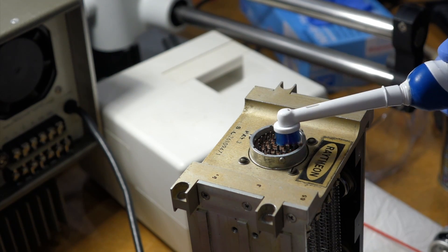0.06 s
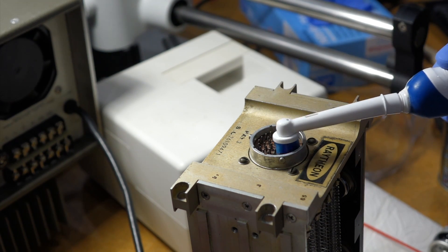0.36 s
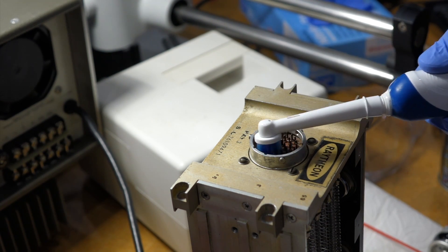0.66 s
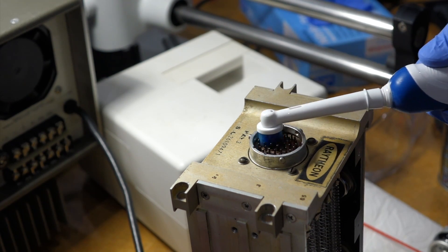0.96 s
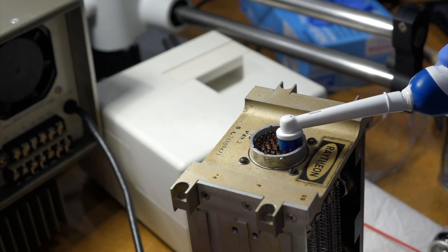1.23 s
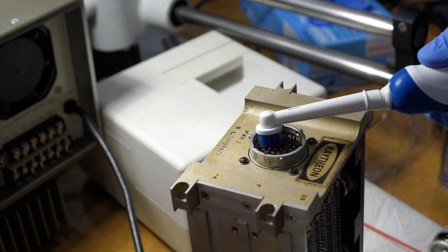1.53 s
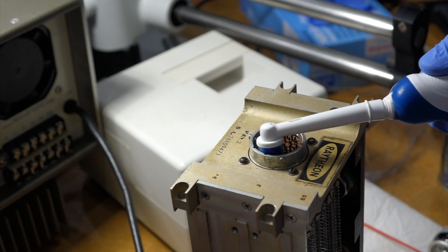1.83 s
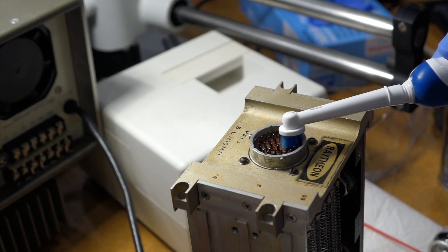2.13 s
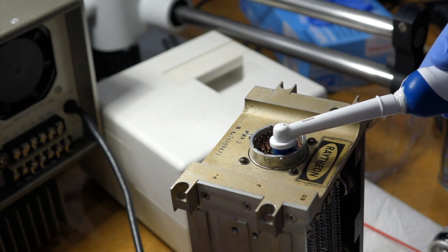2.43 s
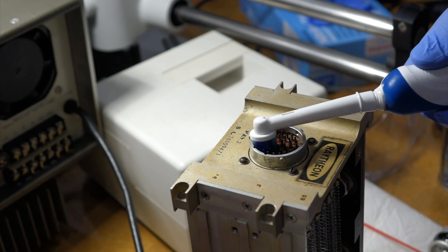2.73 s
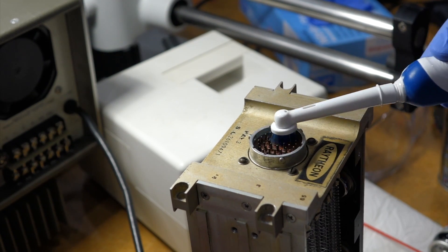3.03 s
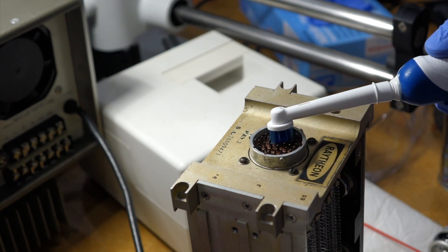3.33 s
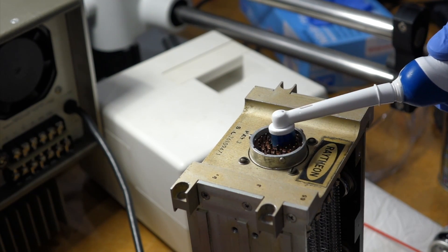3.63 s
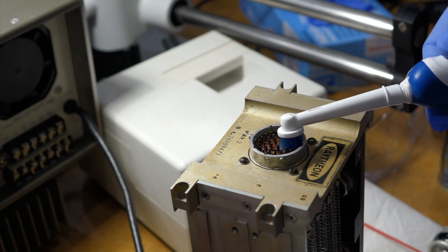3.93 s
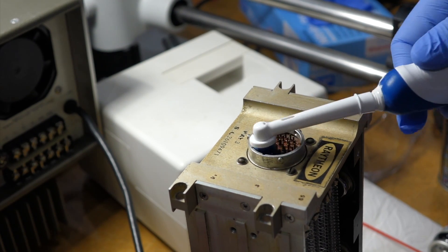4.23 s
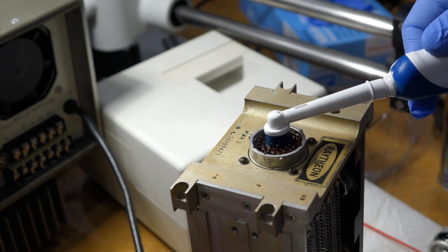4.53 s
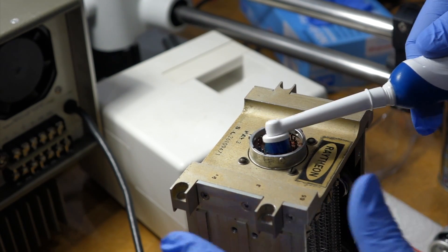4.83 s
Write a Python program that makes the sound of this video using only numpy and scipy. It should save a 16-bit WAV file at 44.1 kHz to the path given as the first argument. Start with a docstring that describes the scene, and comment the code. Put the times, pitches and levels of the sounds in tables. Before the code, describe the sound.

An electric toothbrush scrubs the pins of a metal connector, its head rattling in a fast buzz while the bristles hiss and rasp and the metal rings lightly. It snags a few times, slows under pressure and runs down a little past halfway. A few handling clicks follow, then it spins up and scrubs on. The sound is close and fairly dry, on a workbench in a quiet room.

```python
"""Electric toothbrush on corroded pins

An electric toothbrush scrubs a metal connector on a workbench. Its head knocks at both ends of every
swing, ringing pins and shell, while the bristles hiss, rasp and snag over the motor's hum. The motor runs
down, the handle is shifted, a click sounds and it spins up again. Faint room and electrical noise lie below."""
import sys
import numpy as np
from scipy import signal
from scipy.fft import rfft, irfft
from scipy.io import wavfile

SR = 44100
rng = np.random.default_rng(int(sys.argv[2]) if len(sys.argv) > 2 else 0)


def transcribe(u):
    """Save the signal u as a 16-bit wav file named by the first command-line argument.

    u: samples, shape (n,) or (channels, n), limited to [-1, 1]; the rate is SR.
    q: integer samples, one column per channel.
    """
    v = np.clip(np.atleast_2d(u).T, -1, 1)
    q = np.round(v * 32767).astype(np.int16)
    wavfile.write(sys.argv[1], SR, q)


N = 219559
TIME = np.arange(N) / SR

# two motor runs, the brush seated differently in each: on/s, off/s, base bristle pressure/0-1
MOTOR_RUNS = [(-.055, 2.805, 0.29), (3.573, 5.2, 0.69)]
# leaning on the brush slows the drive: t/s, rate lost/(reversals per s)
LOAD_SAG = [(.75, 0), (1.15, 2.2), (1.58, 4.7), (1.8, 2.5), (1.98, 3), (2.16, 10), (2.27, 35), (2.38, 42),
            (2.5, 23), (2.64, 15), (2.8, 11.5), (3.6, 0), (3.95, .3), (4.35, 2.5), (4.55, 4.7), (4.78, 4.7),
            (4.98, 10)]
# scrubbing balance as the brush circles: t/s, bristle hiss/dB, head rattle/dB, pin ring/dB
SCRUB_LEVELS = [(.05, -36.5, -38.5, -46), (.16, -34.5, -44.5, -51), (.3, -38, -40, -46.5),
                (.55, -35, -42, -40), (.95, -30.5, -37, -42), (1.375, -33, -40, -43.5),
                (1.41, -31.5, -36, -43), (1.6, -32, -40.5, -40.5), (1.85, -33.5, -37, -44),
                (2.1, -32, -37.5, -44.5), (2.3, -36, -38, -46.5), (2.45, -36.5, -38.5, -39),
                (2.53, -37, -43, -48.5), (2.62, -37.5, -38.5, -37), (2.74, -33, -37, -40.5),
                (2.82, -31, -39.5, -43.5), (3.72, -34, -37, -45), (3.85, -35, -49, -43),
                (4.3, -33.5, -43, -44), (4.55, -30, -43.5, -41.5), (4.75, -34, -47, -43),
                (4.98, -34.5, -45, -59)]

# resonances of brush head, connector shell, handle, neck and pin block: f/Hz, width/Hz, level/dB
HEAD_MODES = [(454, 120, -19), (866, 66, -12), (1190, 250, -13), (1377, 160, -3), (1787, 220, -8)]
SHELL_MODES = [(420, 240, -12), (960, 47, -3), (1150, 79, -8), (2500, 230, -0.5), (3050, 140, -5),
               (3400, 170, -0.5)]
HANDLE = [(480, 90, -9), (1210, 150, 2), (1750, 500, -2), (2480, 480, -1), (3350, 300, 0), (4500, 900, -5),
          (6100, 1200, -8), (9200, 1800, -12)]
NECK = [(480, 110, 0), (1320, 170, 3), (2430, 99, -4), (3890, 130, -8), (4500, 110, -11)]
PIN_BLOCK = [(1150, 120, 7), (2320, 110, 3), (2560, 130, 1), (2900, 150, 0), (3420, 130, -3),
             (3890, 100, -8)]
# two moving air resonances between head and socket: t/s, hollow f/Hz, rim gap f/Hz, rim level/dB
AIR_GAPS = [(.3, 1640, 2030, 2), (1.25, 1630, 2100, 0), (1.95, 1530, 2118, 1), (2.1, 1710, 1940, -2),
            (2.28, 1500, 2130, -9), (2.85, 1514, 2120, 7), (3.75, 1490, 2230, 9), (4.05, 1490, 2170, -1),
            (4.35, 1530, 2130, 3), (4.82, 1590, 2060, 2.5), (4.98, 1590, 2040, -2)]
# two-note ring of the pins under the brush: t/s, lower f/Hz, upper f/Hz, upper against lower/dB
PIN_NOTES = [(.3, 2570, 2790, -4), (1.0, 2580, 2820, -4.5), (2.25, 2580, 2820, -3), (2.39, 2570, 2830, -2),
             (2.44, 2490, 2860, -3), (2.7, 2548, 2920, -5), (3.95, 2560, 2860, -3), (4.35, 2520, 2960, 3.5),
             (4.65, 2560, 2920, 2), (4.8, 2600, 3040, 8)]
# the head leans on the shell and rings it: t/s, length/s, level/dB
SHELL_LEANS = [(0.2, 0.25, -47.5), (3.816, .55, -41), (4.424, .6, -40)]

# colour of lightly and firmly pressed bristles: f/Hz, density/dB
LIGHT_HISS = [(100, -14), (700, -12.5), (2000, -20), (3150, -10.5), (4100, -2.5), (4450, -4), (4800, -0.5),
              (5400, -0.5), (5950, 1), (6300, -12.5), (7300, -14.5), (8700, -14.5), (9500, -10),
              (10100, -13), (10900, -7)]
FIRM_HISS = [(100, -12), (700, -20.5), (2000, -1), (2850, 2.5), (3150, -7), (3800, -4), (4600, -4.5),
             (5400, 4), (5950, 5.5), (6600, 1), (7400, -8.5), (8600, -11.5), (9400, -11.5), (10100, -10),
             (10900, -11.5)]
# the tufts flick cleanly or drag: t/s, drag against flicks/ratio
TUFT_DRAG = [(.12, 1.15), (.4, .85), (1.15, .45), (1.5, .8), (1.75, 1.1), (1.95, .55), (2.4, .85),
             (2.8, .7), (3.75, .85), (4.3, .6), (4.55, .33), (4.98, .7)]
# bristles dragged across the pins: t/s, length/s, level/dB
RASP_PASSES = [(0.224, 0.2, -35), (1.382, 0.18, -37), (1.51, 0.082, -34), (3.818, 0.18, -39.5),
               (4.916, .06, -42)]
# the head snags on the shell: t/s, hold/s, decay/s, shell scrape/dB, pin rasp/dB, bristle hiss/dB
SNAGS = [(0.791, .003, 0.0055, -43, -46, -29.5), (1.378, 0.014, 0.01, -39, -32.5, -30.5),
         (1.619, 0.01, 0.049, -23.5, -36, -36), (2.07, 0.019, 0.0072, -48, -45, -35.5),
         (4.367, 0.0029, 0.0024, -45, -40, -25.5)]
# tufts judder along the rim: t/s, length/s, attack/s, release/s, level/dB, first f/Hz, last f/Hz
RIM_JUDDER = (1.48, .2, .1, .035, -34, 1480, 1090)
# tufts spring off a pin: t/s, level/dB
TUFT_SNAPS = [(.944, -22), (1.755, -21), (2.07, -20), (2.076, -19), (2.09, -18), (2.146, -24), (2.601, -24),
              (3.934, -22), (3.972, -22), (4.343, -22), (4.369, -23)]
# colour of pin rasp, shell scrape and tuft snap: f/Hz, density/dB
RASP_COLOUR = [(150, -30), (600, -7.5), (800, -5.5), (1080, 2.5), (1600, 1), (2200, -0.5), (2850, 1),
               (3200, -7.5), (3900, -2.5), (5700, -7), (6800, -8), (11000, -16)]
SCRAPE_COLOUR = [(150, -20), (600, -8), (900, 7.5), (2000, -6), (2900, 14), (3250, 15.5), (4300, 14.5),
                 (5700, 6), (6800, -20), (11000, -28)]
SNAP_COLOUR = [(300, -21), (1500, -19), (2700, 4), (3300, -11), (5700, 12), (7500, 0), (11000, -9)]

# rotor hum at full speed: t/s, level/dB
ROTOR_HUM = [(.1, -67), (.4, -56.5), (.78, -57), (.9, -66), (1.08, -62), (1.18, -54.5), (1.38, -50.5),
             (1.55, -55), (1.8, -64.5), (2.1, -50.5), (2.18, -44.5), (2.25, -69), (2.75, -55), (3.72, -75),
             (3.9, -54.5), (4.5, -58), (4.98, -61)]
# gear whine at full speed: multiple of the full swing rate, level/dB
GEAR_TONES = [(3, -69), (4, -72), (5, -62), (6, -67.5), (8, -69), (10, -65), (11, -59), (13, -58),
              (14, -59), (15, -61), (16, -61)]

# handling clicks: t/s, level/dB, contact/s, decay/s, part that rings
CLICKS = [(3.150, -23.5, .002, .003, NECK), (3.214, -23.5, .004, .0035, PIN_BLOCK),
          (3.549, -15.5, .0005, .0016, HANDLE), (3.638, -19, .0004, .0007, HANDLE)]
# dull bumps of the handle: t/s, level/dB, f/Hz
HANDLE_BUMPS = [(.985, -53, 218), (1.061, -53, 205), (2.893, -46, 187), (2.93, -62, 214), (4.282, -46, 215),
                (4.345, -54, 205), (4.75, -45, 210), (4.835, -43, 327), (4.89, -47.5, 239)]
# tufts slip as the brush is shifted between runs: t/s, length/s, level/dB
TUFT_SLIPS = [(3, 0.033, -44), (3.073, 0.041, -48.5), (3.116, 0.034, -49.5), (3.178, 0.069, -55.5),
              (3.257, 0.026, -53), (3.305, 0.017, -53), (3.378, .015, -57), (3.438, 0.013, -57)]
# faint glove squeaks: t/s, length/s, f/Hz, level/dB
GLOVE_SQUEAKS = [(3.1, 0.032, 1040, -55), (3.405, 0.036, 1075, -54)]

# colour of the room tone: f/Hz, density/dB
ROOM_COLOUR = [(15, 4), (60, 2.5), (130, -5.5), (260, -3), (480, -4), (850, -6), (1200, -5.5), (1700, -10),
               (3000, -15), (5500, -17), (7500, -23), (11000, -28)]
# steady electrical tones: f/Hz, level/dB
ELECTRICAL_TONES = [(60, -67), (1911, -69.5)]

FREE_RATE = 156  # head reversals per s without load


def spin(spin_up_s=.075, coast_s=.27, coast_bend=1.5):
    """Share of full speed: the motor closes in on it when switched on and coasts to rest when off."""
    share = np.zeros(N)
    for on, off, _ in MOTOR_RUNS:
        rise = 1 - np.exp(-np.maximum(TIME - on, 0) / spin_up_s)
        coast = 1 - np.clip((TIME - off) / coast_s, 0, 1) ** coast_bend
        share += rise * coast
    return share


def seating(delay_s=.022, grip_s=.075):
    """Grip (0-1) and base pressure of each run: the bristles take hold just after switch-on."""
    runs = np.array(MOTOR_RUNS)
    current = np.maximum(np.searchsorted(runs[:, 0], TIME) - 1, 0)
    on, _, pressure = runs[current].T
    return np.clip((TIME - on - delay_s) / grip_s, 0, 1), pressure


def knocks(reversals, jitter_s=.00005, uneven_db=.84, return_lag_s=.00025, return_db=-2,
           rebound_s=.0021, rebound_db=-2.5):
    """The head hits the end of its play at each reversal and rebounds; the way back is late and soft."""
    at = np.flatnonzero(np.diff(np.floor(reversals)) > 0)
    chance = np.clip(rng.standard_normal((len(at), 4)), -2, 2)
    returning = np.arange(len(at)) % 2
    hit_at = at / SR + jitter_s * chance[:, 0] + return_lag_s * returning
    force = from_db(uneven_db * chance[:, 1] + return_db * returning)
    rebound_at = hit_at + rebound_s * (1 + .1 * chance[:, 2])
    rebound_force = force * from_db(rebound_db + uneven_db * chance[:, 3])
    hits = np.zeros(N)
    for t, size in ((hit_at, force), (rebound_at, rebound_force)):
        hits[np.clip((t * SR).astype(int), 0, N - 1)] += size
    return hits


def contact(hits, crunch=.55, crunch_s=.0013, rub=.22):
    """Force at the head: each knock trails a short crunch, with sliding friction in between."""
    friction = (crunch * rms_one(fade(hits, crunch_s)) + rub) * rng.standard_normal(N)
    return butter(rms_one(hits) + friction, 4, 367, "high")  # small parts radiate hardly any bass


def head_rattle(hits, roam_hz=35.3):
    """Knocks ring the head and the hollow under it, whose pitch roams as the brush circles."""
    hollow_hz, _, _ = in_time(AIR_GAPS)
    body = resonate(contact(hits), HEAD_MODES)
    hollow = moving_band(contact(hits), hollow_hz + roam_hz * wander(.022), width_hz=185)
    return rms_one(body + hollow)


def pin_ring(hits, width_hz=85, top_hz=3030):
    """The knocked pins ring at two pitches that shift with the brush."""
    lower_hz, upper_hz, upper_db = in_time(PIN_NOTES)
    force = contact(hits)
    lower = moving_band(force, lower_hz, width_hz)
    upper = from_db(upper_db) * moving_band(force, upper_hz, width_hz)
    return rms_one(butter(lower - upper, 12, top_hz))


def shell_ring(hits, head_db, free_db=-15.5):
    """Shell and rim gap ring faintly under the rattle and open up where the head leans on them."""
    _, rim_hz, rim_db = in_time(AIR_GAPS)
    rim = from_db(rim_db) * moving_band(contact(hits), rim_hz, width_hz=130)
    metal = resonate(contact(hits), SHELL_MODES)
    leaning = sum(swells(SHELL_LEANS, attack_s=.055, release_s=.063))
    return np.hypot(leaning, from_db(head_db + free_db)) * rms_one(metal + rim)


def bristles(hits, pressure, snap=.45, flick_s=.001, catches_per_s=420, catch_s=.0008, smooth=.55):
    """The tufts flick over at each reversal and drag in small catches between; pressure colours them."""
    flicks = rms_one(fade(hits, flick_s)) * grains(per_s=30000, spread_db=.5) + snap * rms_one(hits)
    catches = rms_one(fade(rng.random(N) < catches_per_s / SR, catch_s))
    dragging = rms_one((catches + smooth) * grains(per_s=30000, spread_db=.5))
    hiss = tuft_colour(rms_one(flicks + in_time(TUFT_DRAG)[0] * dragging), pressure)
    sheen_hz = 9800 + 450 * wander(.06)  # the tufts' highest ring shifts as they bend
    return hiss + .7 * moving_band(hiss, sheen_hz, width_hz=600)


def tuft_colour(drive, pressure):
    """Pressure crossfades the bristles from their light colour to their firm one."""
    firm = np.clip(pressure, 0, 1)
    return (1 - firm) * coloured(drive, LIGHT_HISS) + firm * coloured(drive, FIRM_HISS)


def pin_rasp(hits, light_db=-41.5):
    """Bristles rasp over the pins in time with the swing: a light bed with a few harder passes."""
    stroke = rms_one(1 + rms_one(fade(hits, .003)))
    passes = swells(RASP_PASSES, attack_s=.0069, release_s=.16)
    level = np.sqrt(from_db(light_db) ** 2 + sum(p ** 2 for p in passes))
    return level * coloured(stroke * grains(per_s=6000, spread_db=3), RASP_COLOUR)


def snags(attack_s=.002):
    """A snag bites at once, holds and dies away: an unbroken scratch on shell, pins and tufts."""
    out = np.zeros(N)
    for k, colour in enumerate((SCRAPE_COLOUR, RASP_COLOUR, FIRM_HISS)):
        level = sum(from_db(dbs[k]) * swell(t, hold, attack_s, decay) for t, hold, decay, *dbs in SNAGS)
        out += level * coloured(grains(per_s=20000, spread_db=1), colour)
    return out


def judder(hits, width_hz=600):
    """The tufts stick and slip along the rim, ringing a resonance that falls as they bend."""
    start, length, attack_s, release_s, db, first_hz, last_hz = RIM_JUDDER
    centre_hz = np.interp(TIME, [start, start + length], [first_hz, last_hz])
    slips = (1 + rms_one(fade(hits, .003))) * grains(per_s=2500, spread_db=1.5)
    ringing = moving_band(moving_band(slips, centre_hz, width_hz), centre_hz, width_hz)
    return from_db(db) * swell(start, length, attack_s, release_s) * rms_one(ringing)


def snaps(decay_s=.00033):
    """Single tufts catch on a pin and spring free with a sharp tick."""
    ticks = np.zeros(N)
    for t, db in TUFT_SNAPS:
        ticks[int(t * SR)] = from_db(db)
    return coloured(fade(ticks, decay_s) * rng.choice([-1, 1], N), SNAP_COLOUR)


def motor(reversals, rate, rotor_ratio=1.135, flutter_db=2.6):
    """The rotor's imbalance hums and the gears add wavering overtones; both fade as the drive slows."""
    def tone(multiple, waver_rad=.17):
        return np.sqrt(2) * np.sin(multiple * (2 * np.pi * reversals + waver_rad * wander(.047)))
    hum_db = in_time(ROTOR_HUM)[0] + flutter_db * wander(.016)  # flutters under load
    hum = from_db(hum_db) * tone(rotor_ratio, waver_rad=.66)
    # under one hard push the rotor buzzes on its third multiple
    push = swell(start=2.08, length=.07, attack_s=.02, release_s=.025)
    buzz = from_db(-53.5) * push * tone(3 * rotor_ratio)
    gears = sum(from_db(db) * tone(k / 2) for k, db in GEAR_TONES)  # two reversals a swing
    return (rate / FREE_RATE) ** 4 * (hum - gears) + buzz


def clicks(attack_s=.0003, top_hz=6000):
    """A spike and a short crack of noise ring the part that is knocked."""
    out = np.zeros(N)
    for t, db, contact_s, decay_s, part in CLICKS:
        crack = .5 * swell(t, contact_s, attack_s, decay_s) * rng.standard_normal(N) + 1e-18
        crack[int(t * SR)] += 3.5
        out += from_db(db) * resonate(butter(crack, 1, top_hz), part)
    return out


def bumps(width_hz=57):
    """The bumped handle thuds on one low resonance."""
    out = np.zeros(N)
    for t, db, hz in HANDLE_BUMPS:
        thud = rms_one(resonate(rng.standard_normal(N), [(hz, width_hz, 0)]))
        out += from_db(db) * swell(t, 0, attack_s=.0041, release_s=.046) * thud
    return out


def tuft_slips(clump_db=3.5, clump_s=.0019):
    """Between runs the tufts slip in small clumps as the brush is shifted."""
    level = sum(swells(TUFT_SLIPS, attack_s=.0087, release_s=.0152))
    clumps = rms_one(grains(per_s=4500, spread_db=5) * from_db(clump_db * wander(clump_s)))
    return level * tuft_colour(clumps, pressure=.19)


def glove_squeaks(pitch_spread=.0156):
    """The glove slips in short squeaks: four harmonics on an unsteady pitch."""
    out = np.zeros(N)
    slip = rms_one(fade(rng.standard_normal(N), .0038))
    for t, length, hz, db in GLOVE_SQUEAKS:
        phase = 2 * np.pi * np.cumsum(hz * (1 + pitch_spread * slip)) / SR
        arch = np.sin(np.pi * np.clip((TIME - t) / length, 0, 1))
        out += from_db(db) * arch * sum(np.sin(k * phase) / np.sqrt(k) for k in range(1, 5))
    return out


def workshop(x, bench_db=-15, bench_t60=.061, room_db=-16, room_t60=.79):
    """Adds quick reflections from the bench and the gear on it, then a faint room tail."""
    t = TIME[:SR // 2]
    response = np.zeros(len(t))
    for db, t60, delay_s in ((bench_db, bench_t60, .001), (room_db, room_t60, .008)):
        tail = rng.standard_normal(len(t)) * from_db(-60 * t / t60) * (t > delay_s)
        response += from_db(db) * tail / np.sqrt(np.sum(tail ** 2))
    return x + signal.fftconvolve(x, response)[:N]


def background(first_tick_s=.0257, tick_period_s=.1024, tick_width_s=.0042):
    """Room tone, steady electrical tones and dull ticks of radio interference in the microphone lead."""
    room = from_db(-55) * coloured(rng.standard_normal(N), ROOM_COLOUR)
    tones = sum(np.sqrt(2) * from_db(db) * np.sin(2 * np.pi * hz * TIME) for hz, db in ELECTRICAL_TONES)
    bursts = -1.0 * ((TIME - first_tick_s) % tick_period_s < tick_width_s)
    ticks = from_db(-44) * butter(bursts, 1, [24.2, 410], "band")
    return room + tones + ticks


def from_db(db):
    """Decibels to gain."""
    return 10 ** (np.asarray(db) / 20)


def rms_one(x):
    """Scale to unit rms."""
    return x / np.sqrt(np.mean(x ** 2) + 1e-20)


def in_time(rows):
    """One automation curve for each column after the time."""
    times, *columns = np.transpose(rows)
    return [np.interp(TIME, times, column) for column in columns]


def swell(start, length, attack_s, release_s):
    """Envelope: straight attack, hold to the end of the length, exponential release."""
    attack = np.clip((TIME - start) / attack_s, 0, 1)
    return attack * np.exp(-np.maximum(TIME - start - length, 0) / release_s)


def swells(cues, attack_s, release_s):
    """One envelope for each cue, at its level."""
    return [from_db(db) * swell(t, length, attack_s, release_s) for t, length, db in cues]


def fade(x, decay_s):
    """Each impulse leaves an exponential tail of its own height."""
    return signal.lfilter([1], [1, -np.exp(-1 / (decay_s * SR))], x + 1e-18)


def wander(time_s):
    """Smooth random drift of unit rms."""
    return rms_one(fade(fade(rng.standard_normal(N), time_s), time_s))


def grains(per_s, spread_db):
    """Tiny slips of single bristles, at random moments and of uneven size."""
    slips = (rng.random(N) < per_s / SR) * rng.standard_normal(N)
    return rms_one(slips * from_db(spread_db * np.clip(rng.standard_normal(N), -2, 2)))


def butter(x, order, hz, kind="low"):
    """Low-, high- or band-pass with a flat passband."""
    return signal.sosfilt(signal.butter(order, hz, kind, fs=SR, output="sos"), x)


def coloured(x, spectrum, size=4096):
    """Minimum-phase EQ with the given spectrum; white noise keeps its power."""
    hz, db = np.transpose(spectrum)
    bin_hz = np.arange(size // 2 + 1) * SR / size
    gain = rms_one(from_db(np.interp(np.log(bin_hz + 1), np.log(hz), db)))
    cepstrum = irfft(np.log(gain))
    cepstrum[1:size // 2] *= 2
    cepstrum[size // 2 + 1:] = 0
    return signal.fftconvolve(x, irfft(np.exp(rfft(cepstrum))))[:N]


def resonate(x, modes):
    """Parallel resonances of alternating sign."""
    out = np.zeros(N)
    for k, (hz, width_hz, db) in enumerate(modes):
        r = np.exp(-np.pi * width_hz / SR)
        poles = [1, -2 * r * np.cos(2 * np.pi * hz / SR), r * r]
        out += (-1) ** k * from_db(db) * (1 - r * r) / 2 * signal.lfilter([1, 0, -1], poles, x)
    return out


def moving_band(x, centre_hz, width_hz, block=256):
    """A resonance whose centre follows a curve."""
    r = np.exp(-np.pi * width_hz / SR)
    out, state = np.zeros(N), np.zeros(2)
    for i in range(0, N, block):
        poles = [1, -2 * r * np.cos(2 * np.pi * centre_hz[i] / SR), r * r]
        out[i:i + block], state = signal.lfilter([1, 0, -1], poles, x[i:i + block], zi=state)
    return out * (1 - r * r) / 2


def scene():
    """One drive speed times knocks, bristles and motor tones; the hand sets how hard they scrub."""
    running = spin()
    rate = running * (FREE_RATE - in_time(LOAD_SAG)[0])
    reversals = np.cumsum(rate) / SR
    grip, base_pressure = seating()
    hiss_db, head_db, pin_db = in_time(SCRUB_LEVELS)
    pressure = base_pressure + .13 * (hiss_db + 32)  # louder hiss means firmer pressure
    hand_tremor = from_db(.5 * wander(.015))
    hits = knocks(reversals)
    head = from_db(head_db) * head_rattle(hits)
    connector = from_db(pin_db) * pin_ring(hits) + shell_ring(hits, head_db)
    hiss = from_db(hiss_db) * bristles(hits, pressure)
    scrubbing = grip * hand_tremor * running * (head + connector + hiss + pin_rasp(hits))
    accents = snags() + judder(hits) + snaps()
    handling = clicks() + bumps() + tuft_slips() + glove_squeaks()
    brush = scrubbing + accents + motor(reversals, rate) + handling
    return (workshop(brush) + background())[None]


def record(dry, cutoff_hz=11030):
    """A steep high cut takes off the top."""
    return signal.sosfilt(signal.ellip(12, .1, 90, cutoff_hz, fs=SR, output="sos"), dry)


dry = scene()
out = record(dry)
transcribe(out)
```